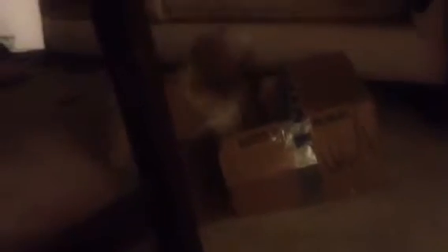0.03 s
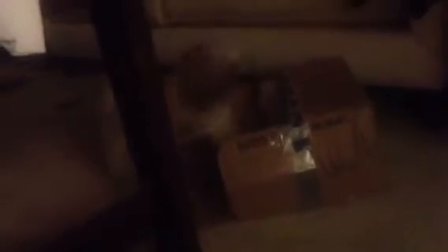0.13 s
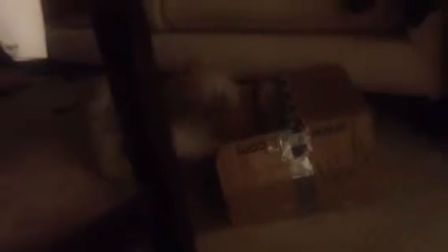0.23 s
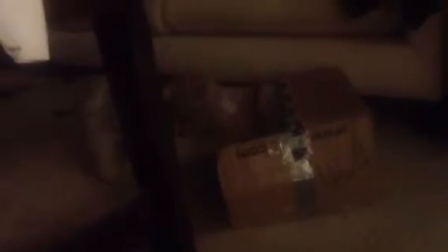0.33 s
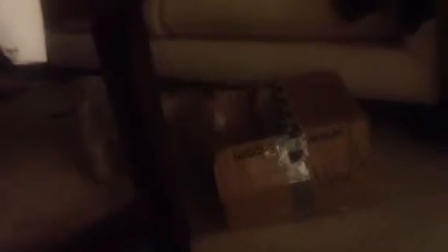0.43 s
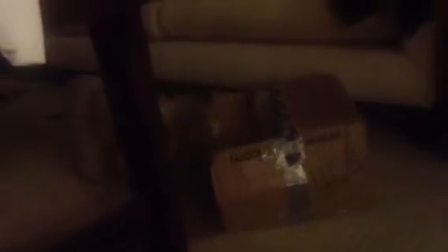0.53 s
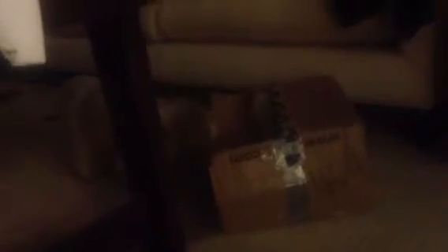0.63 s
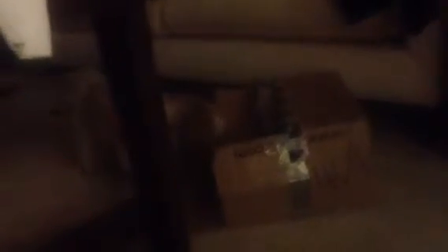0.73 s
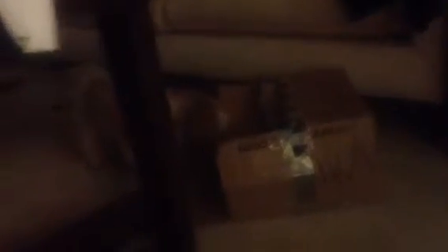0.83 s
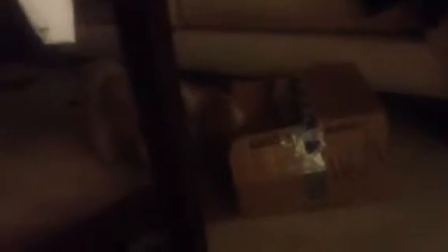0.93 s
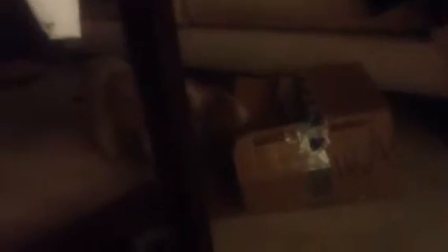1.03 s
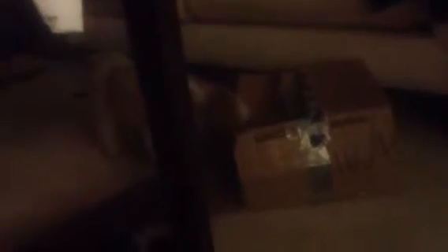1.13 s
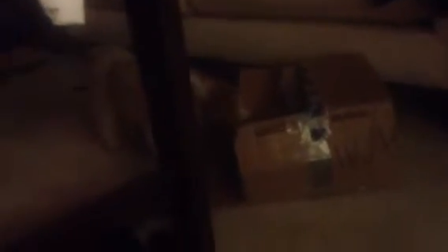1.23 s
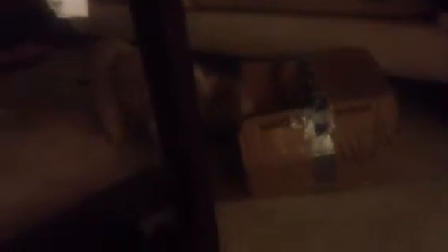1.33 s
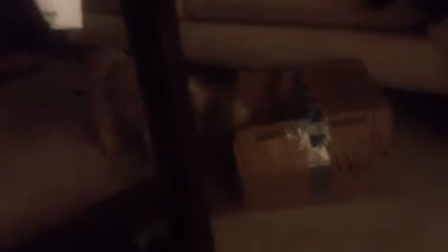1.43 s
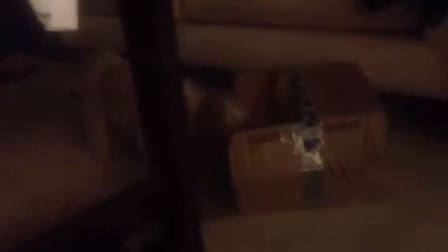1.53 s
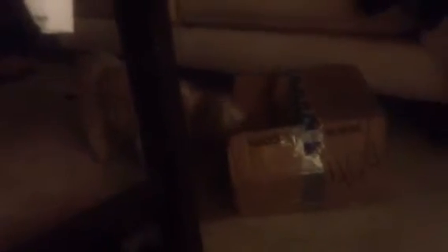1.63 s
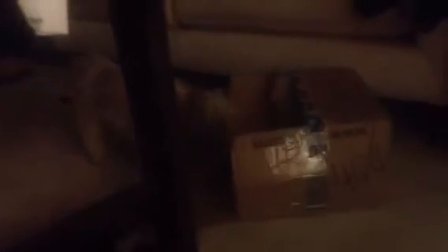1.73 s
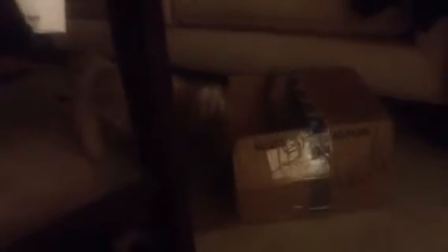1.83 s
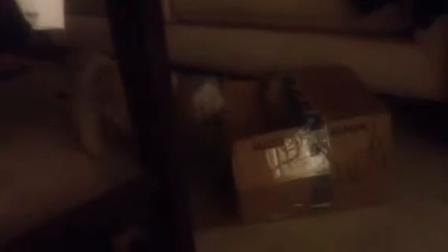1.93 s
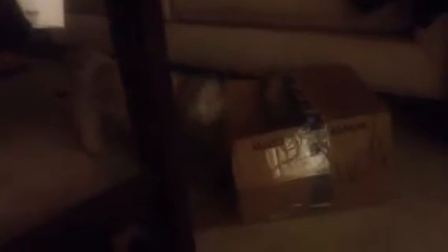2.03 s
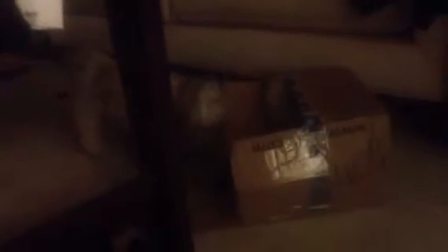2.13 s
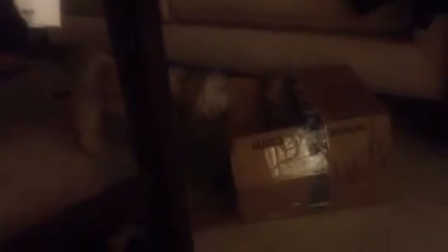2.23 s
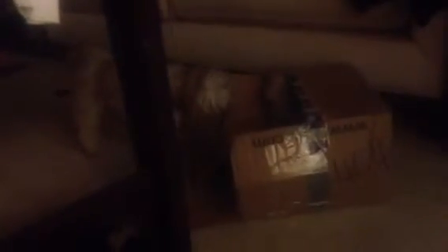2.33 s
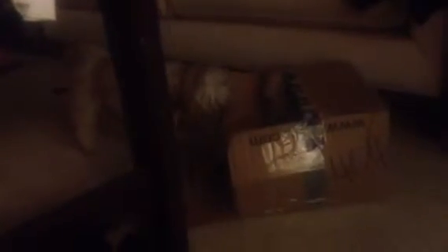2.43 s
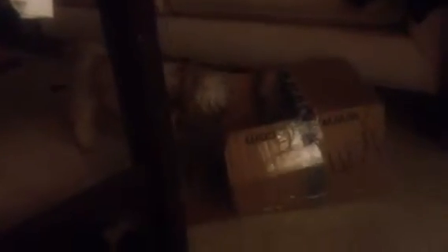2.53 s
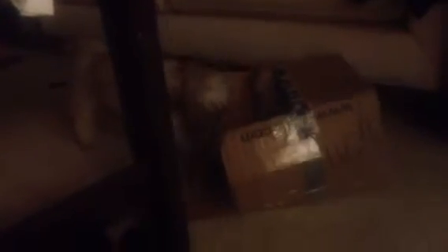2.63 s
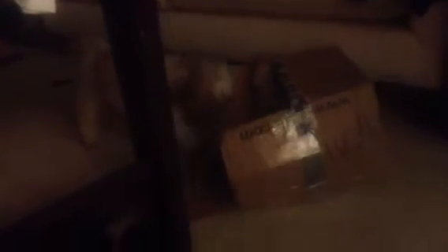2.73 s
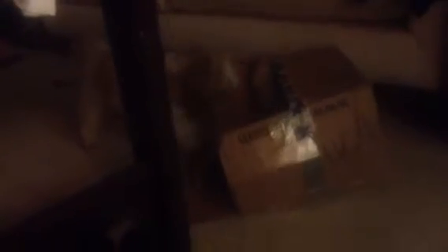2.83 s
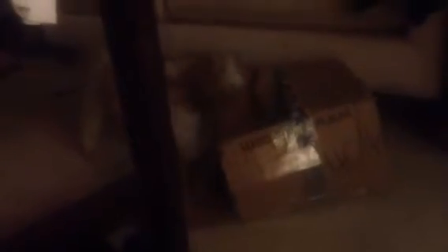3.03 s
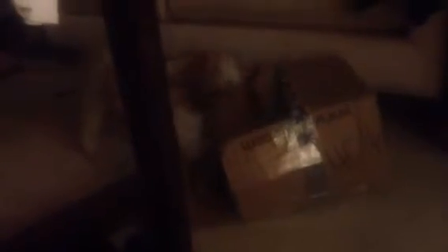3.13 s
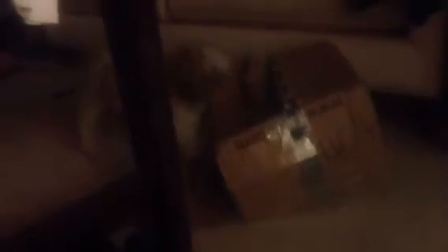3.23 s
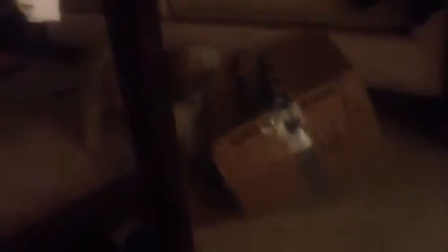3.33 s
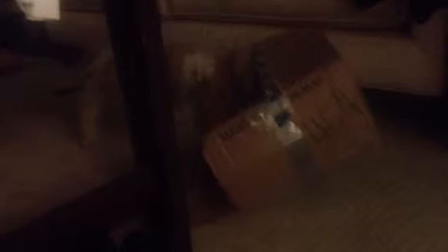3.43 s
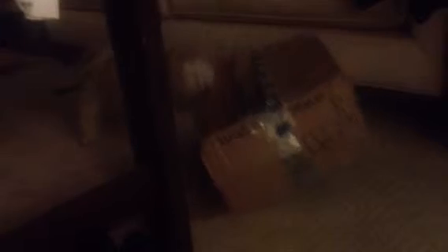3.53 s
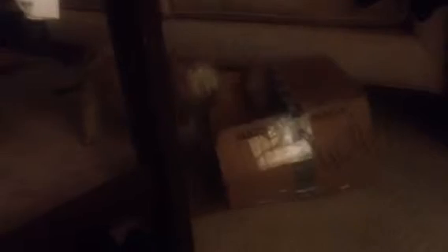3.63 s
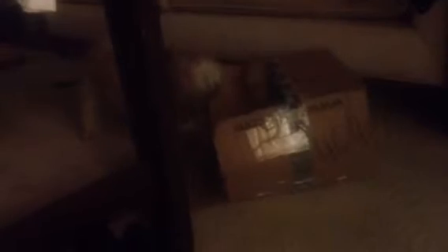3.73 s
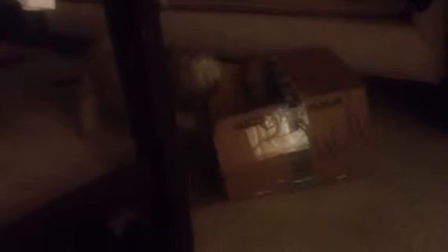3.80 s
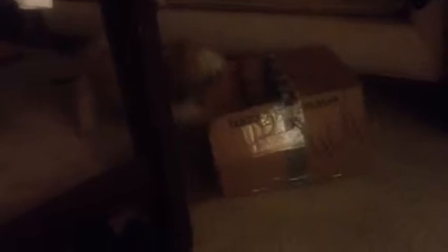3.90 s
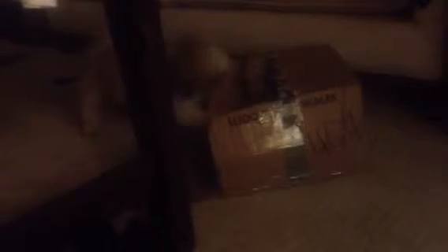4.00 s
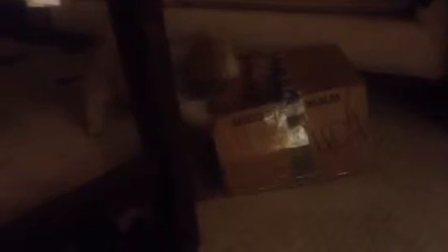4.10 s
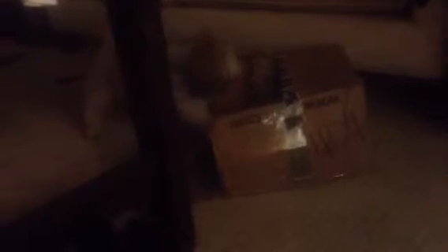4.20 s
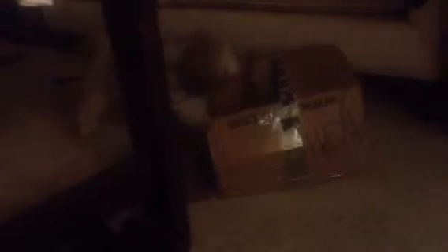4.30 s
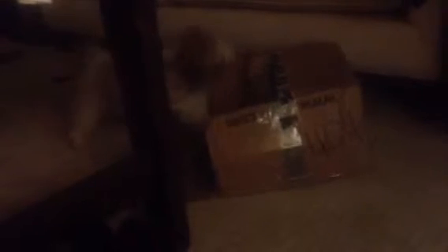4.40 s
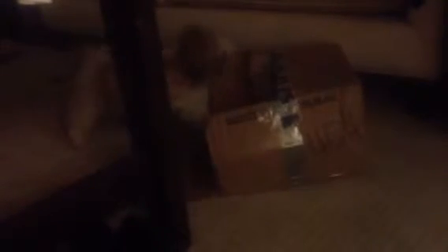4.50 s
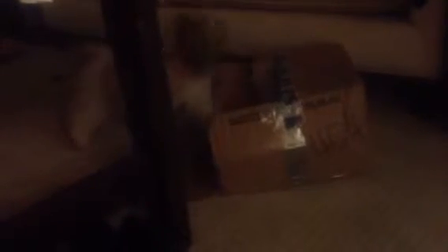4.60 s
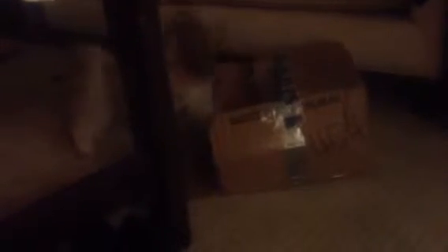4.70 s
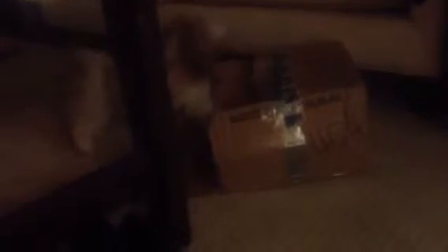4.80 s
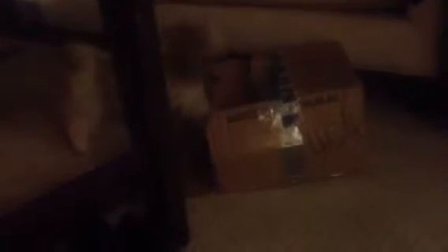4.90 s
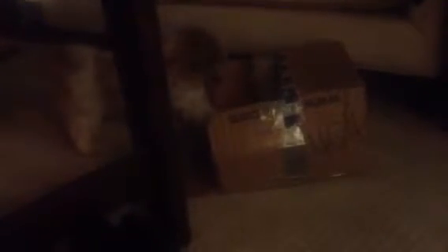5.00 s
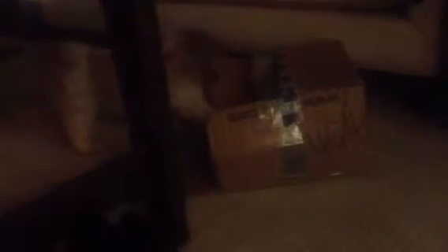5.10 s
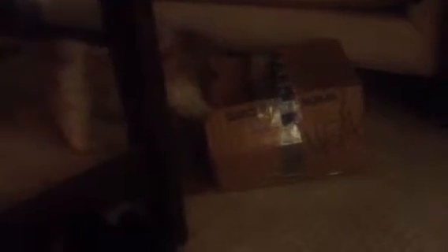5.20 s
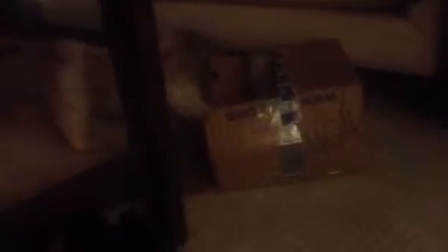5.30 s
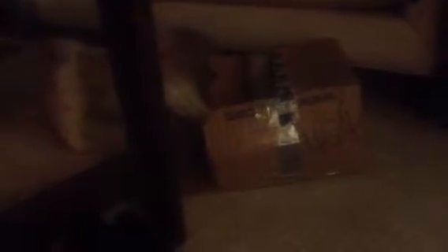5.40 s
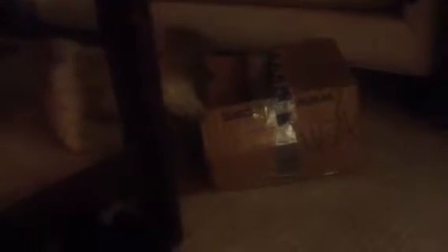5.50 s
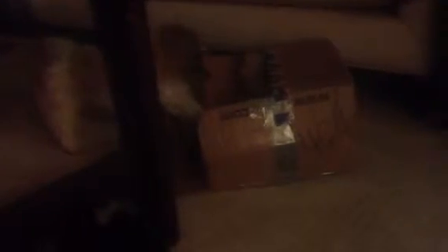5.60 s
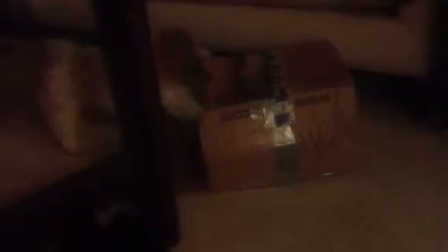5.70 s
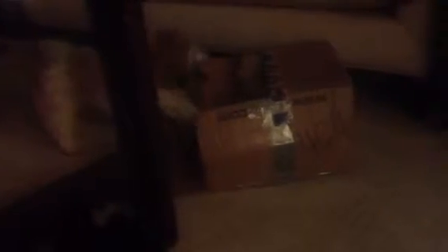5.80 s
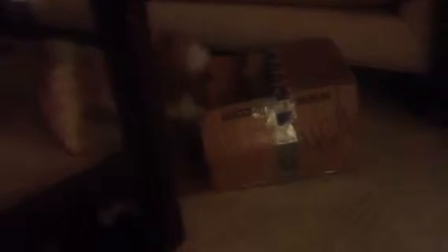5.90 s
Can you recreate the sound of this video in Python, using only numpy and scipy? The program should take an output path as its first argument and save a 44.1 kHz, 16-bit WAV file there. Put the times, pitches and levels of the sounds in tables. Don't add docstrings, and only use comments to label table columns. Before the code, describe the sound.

A dog paws and noses a cardboard box on carpet, with hollow thuds, sharp claw cracks, board scrapes and papery rustles in a quiet room.

```python
import sys
import numpy as np
from scipy import signal
from scipy.fft import rfft, irfft, next_fast_len
from scipy.io import wavfile
from scipy.ndimage import uniform_filter1d, map_coordinates

SR = 44100
rng = np.random.default_rng(int(sys.argv[2]) if len(sys.argv) > 2 else 0)


def makeup_ratio(level_db):
    decades = np.asarray(level_db, float) / 20
    return 10 ** decades


def waveform_to_disk(signal):
    frames = np.transpose(np.atleast_2d(signal))
    scaled = np.clip(frames, -1, 1) * 32767
    samples = np.round(scaled).astype(np.int16)
    wavfile.write(sys.argv[1], SR, samples)


N = 262395


def unit(x):
    return x / np.sqrt(np.mean(x ** 2) + 1e-20)


def along(points):
    f, db = np.transpose(points)
    return lambda hz: makeup_ratio(np.interp(np.log(hz + 1), np.log(f), db, left=-120, right=-120))


def modes(rows):
    def response(f):
        total = 0
        for k, (hz, width, db) in enumerate(rows):
            total = total + (-1) ** k * makeup_ratio(db) * 1j * f * width / (hz * hz - f * f + 1j * f * width)
        return total
    return response


def causal(gain):
    def response(hz):
        c = irfft(np.log(np.abs(gain(hz)) + 1e-4))
        c[1:len(c) // 2] *= 2
        c[len(c) // 2 + 1:] = 0
        return np.exp(rfft(c))
    return response


def filtered(x, response):
    m = 2 * next_fast_len(len(x) // 2 + 2048)
    return irfft(rfft(x, m) * response(np.fft.rfftfreq(m, 1 / SR)), m)[:len(x)]


def wobble(rate):
    knots = rng.standard_normal(int(N * rate / SR) + 4)
    return map_coordinates(knots, [np.arange(N) * rate / SR])


def grit(per_second, spread_db, life, grain_db, flutter_db):
    size = makeup_ratio(spread_db * np.minimum(rng.exponential(size=N), 3))
    slips = (rng.random(N) < per_second / SR) * size
    bursts = signal.lfilter([1], [1, -np.exp(-1 / (life * SR))], slips)
    rough = np.sqrt(1 + (makeup_ratio(grain_db) * unit(bursts)) ** 2)
    return rough * makeup_ratio(flutter_db * wobble(40)) * rng.standard_normal(N)


def patchy(x, depth_db):
    z = signal.stft(x, nperseg=128)[2]
    field = uniform_filter1d(rng.standard_normal(z.shape), size=4, axis=0)
    field = uniform_filter1d(field, size=3, axis=1)
    return signal.istft(z * makeup_ratio(depth_db * unit(field)), nperseg=128)[1][:N]


def add(track, s, db, x):
    part = track[max(round(s * SR), 0):][:len(x)]
    part += (makeup_ratio(db) * x / np.abs(x).max())[:len(part)]


def blow(t60, burst_db, rattle_db, room_db, room_t60):
    t = np.arange(SR // 3) / SR
    contact_burst = makeup_ratio(burst_db - 60 * t / .005)
    rattle = makeup_ratio(rattle_db - 60 * t / abs(t60))
    tail = makeup_ratio(rattle_db + room_db - 60 * t / room_t60)
    return (t == 0) + (contact_burst + rattle + tail) * rng.standard_normal(len(t))


# f/Hz, level per Hz/dB
HUM_HISS = [(18, -36), (75, -24.5), (125, -4), (170, -9.5), (228, 6.5), (290, -13), (345, -18.5), (420, -5),
            (480, -12.5), (1300, -13), (2700, -20.5), (5200, -21.5), (9900, -27), (15500, -23.5)]
HUM_HISS_DB = -66.5


def quiet():
    hiss = unit(filtered(rng.standard_normal(N), along(HUM_HISS)))
    return makeup_ratio(HUM_HISS_DB + 0.57 * wobble(2.18)) * hiss


# t/s, length/s, level/dB
SNIFFS = [
    (5.546, 0.0666, -65.5),
    (5.608, 0.10136, -69.5),
    (5.81, 0.069, -62.5),
    (5.886, 0.064, -66),
]
# f/Hz, width/Hz, level/dB
NOSE = [(1430, 365, 2), (1820, 393.7, -1.5), (2700, 208, 1.5), (4720, 360, -17)]


def sniffs():
    air = unit(filtered(rng.standard_normal(N), modes(NOSE)))
    t, puffs = np.arange(N) / SR, 0
    for s, length, db in SNIFFS:
        u = np.clip((t - s) / length, 0, 9)
        puffs = puffs + makeup_ratio(db) * np.minimum(u * 6, 1) * np.exp(-u ** 3.5)
    return puffs * air


def effort(s, db, rise, hold, fade):
    t = np.arange(0, N, 16) / SR - s
    return makeup_ratio(db + 20 * np.minimum(t, 0) / abs(rise) - 20 * np.maximum(t - abs(hold), 0) / abs(fade))


# t/s, board level/dB, hold/s, fade time for 20 dB/s, paper over board/dB
CATCHES = [(0.205, -52, 0.076, 0.0564, 1.5), (0.267, -42, 0.036, 0.1175, -1),
           (1.072, -68, .002, 0.14, -4.5), (1.543, -63, .002, 0.05, -6), (1.734, -64.5, .02, 0.27, 1),
           (1.768, -59, 0.013, 0.1975, -3.5), (2.204, -66.5, .005, 0.32, -0.5),
           (2.407, -53, .003, -0.23, -1), (2.51, -57, 0.028, 2, -0.5), (2.783, -49, .003, 0.1682, 1),
           (2.807, -39.5, 0.0024, 0.113, 3), (3.19, -53.5, 0.0097, 0.53, 1), (3.679, -48, 0.03, 0.1, 0),
           (3.969, -44, 0.0156, 0.2092, 1.5), (4.279, -52, 0.0024, 0.1984, -4.5),
           (4.467, -45.5, 0.0028, 0.1183, 0.5), (4.576, -39, 0.0033, 0.1076, 3),
           (5.208, -71, 0.027, 0.12, 2.5), (5.559, -77, .05, 0.35, -2), (5.827, -74, .03, 4, -12.5)]
CATCH_S = 0.0061
# peak t/s, board level/dB, swell and fade times for 20 dB/s, paper over board/dB
BRUSHES = [(0.046, -54, 1.07, 0.1023, 1.5), (0.358, -44, 0.1166, 0.0734, 2.5), (1.62, -68, 0.4, 0.4, 1),
           (1.88, -64.5, 0.3969, 0.45, 1), (2.33, -72, .4, .5, 0), (2.597, -50, .08, .36, 0),
           (3.06, -48, .22, .052, -1), (3.165, -59, .04, .2, 7), (3.31, -55, .1, .14, 8),
           (3.39, -59, .05, .08, 4), (3.545, -50, .2, .13, -6), (3.62, -63, .1, .11, 6),
           (3.95, -66, .09, .02, 4), (4.08, -54, .1, .08, 1), (4.265, -51.5, .17, .07, 4),
           (4.46, -50.5, .2, .05, 3), (4.765, -62, 1.02, 0.1961, -1.5), (5.1, -76.5, 1, 0.1917, 7),
           (5.49, -69, 0.1, 0.1, -4), (5.93, -63, 0.1255, 0.34, 1)]
# peak t/s, paper level/dB, swell and fade times for 20 dB/s
STIRS = [(1.09, -71, 0.45, 0.54), (1.19, -62, 0.06, 0.17), (1.35, -68, 0.25, 0.33), (1.8, -56, 0.1229, 0.5),
         (1.95, -60, 0.17, 0.24), (2.08, -60, .5, .07), (2.775, -56, .5, .02), (3.0, -55, .15, .1),
         (3.228, -42.5, .07, .18), (3.516, -39.5, .14, .085), (5.74, -73, 1, 0.2)]
STIR_BOARD_DB = -9


def contact():
    catches = [(effort(s, db, CATCH_S, hold, fade), paper_db) for s, db, hold, fade, paper_db in CATCHES]
    brushes = [(effort(s, db, rise, 0, fade), paper_db) for s, db, rise, fade, paper_db in BRUSHES]
    for s, db, rise, fade in STIRS:
        brushes.append((effort(s, db + STIR_BOARD_DB, rise, 0, fade), -STIR_BOARD_DB))
    paper = np.sqrt(sum((g * makeup_ratio(paper_db)) ** 2 for g, paper_db in catches + brushes))
    board = [np.sqrt(sum(g ** 2 for g, _ in kind)) for kind in (catches, brushes)]
    return np.repeat(board + [paper], 16, axis=1)[:, :N]


# f/Hz, level per Hz/dB
PAPER = [(4600, -87.5), (5500, -3.5), (6500, -1), (8500, 0.5), (11000, -1.5), (13000, -3), (15500, -14)]


def rustle(paper):
    leaf = grit(per_second=300, spread_db=5.5, life=0.00103, grain_db=-7.0, flutter_db=1.84)
    return paper * makeup_ratio(-2.03) * unit(filtered(patchy(leaf, depth_db=1.8), along(PAPER)))


# f/Hz, width/Hz, level/dB
CAVITY = [(123.4, 14.2, -4.5), (205, 38.5, 4.5), (231.78, 27.04, 7), (273.86, 14.4, 2), (365.5, 49.4, -6)]
# f/Hz, width/Hz, level/dB
PANELS = [(423.4, 25.98, -5.5), (475, 39, -6), (560, 55.7, -7.5), (663.1, 35.3, 0.5), (776.8, 32.9, -4),
          (914.1, 24.05, 2), (1058, 57.8, -7), (1212, 126.7, -4), (1287, 179, -8.5), (1739.3, 23.79, -4.5)]
# f/Hz, level per Hz/dB
BOARD = [(1100, -7), (1500, -5), (1800, -4.5), (2200, -6.5), (3000, -3.5), (4000, -1.5), (5200, -2.5),
         (6000, -22.5)]
# t/s, level/dB
LEAN = [(0.0, -49.5), (0.16, -69.5), (0.28, -69), (0.45, -61), (0.75, -83), (1.4, -70.5), (2.3, -65.5),
        (2.72, -66), (2.94, -53.5), (3.3, -58.5), (3.45, -61), (3.8, -57), (3.93, -66.5), (4.05, -52),
        (4.37, -62), (4.76, -60), (5.0, -71), (5.95, -66.5)]
LEAN_PANEL_DB = -7.5
CATCH_DULL_DB, CATCH_CAVITY_DB, CATCH_PANEL_DB = -2.5, -17, -9
BRUSH_DULL_DB, BRUSH_CAVITY_DB, BRUSH_PANEL_DB = -3, -6, -4


def strokes(catch, brush):
    lean = makeup_ratio(np.interp(np.arange(N) / SR, *np.transpose(LEAN)))

    def both(catch_gain, brush_gain, rest=0):
        return np.sqrt((catch_gain * catch) ** 2 + (brush_gain * brush) ** 2 + rest ** 2)

    low = grit(per_second=53, spread_db=1.5, life=0.00345, grain_db=-7, flutter_db=3.5)
    face = grit(per_second=400, spread_db=5.5, life=0.0013, grain_db=-8, flutter_db=1.0)
    face = patchy(face, depth_db=2.3)
    dull = makeup_ratio(np.array([CATCH_DULL_DB, BRUSH_DULL_DB]))
    bright = np.sqrt(1 - dull ** 2)

    below = lambda f: 1 / (1 + (f / 2900) ** 8)
    air = lambda f: modes(CAVITY)(f) * f ** 2 / (f ** 2 + 130 ** 2)
    dull_face = lambda f: along(BOARD)(f) * below(f)
    bright_face = lambda f: along(BOARD)(f) * (1 - below(f))

    air_gain = both(makeup_ratio(CATCH_CAVITY_DB), makeup_ratio(BRUSH_CAVITY_DB), lean)
    panel_gain = both(makeup_ratio(CATCH_PANEL_DB), makeup_ratio(BRUSH_PANEL_DB), lean * makeup_ratio(LEAN_PANEL_DB))
    out = air_gain * unit(filtered(low, air))
    out += panel_gain * unit(filtered(low + face, modes(PANELS)))
    out += makeup_ratio(-2.0) * both(*dull) * unit(filtered(face, dull_face))
    out += makeup_ratio(-4.0) * both(*bright) * unit(filtered(face, bright_face))
    return out


# t/s, level/dB, hold/s, fade time for 20 dB/s, f/Hz
CHATTERS = [(0.024, -55, .037, .025, 10600), (0.01, -59.5, 0.052, 0.02, 1310),
            (0.215, -57.5, 0.031, 0.16, 1097), (0.288, -46, 0.014, 0.0378, 6880),
            (0.29, -45.5, 0.0174, 0.0966, 4270), (0.332, -49, .034, .02, 1780),
            (0.33, -50.5, 0.029, 0.0249, 8770), (1.768, -62.5, 0.0193, 0.09, 1500),
            (1.77, -64.5, 0.019, .2, 4300), (2.4135, -45, .007, .05, 4400), (2.414, -54, 0.0098, .05, 1397),
            (2.505, -46.5, 0.0217, -0.063, 1750), (2.506, -51, 0.0153, -0.07, 2700),
            (2.588, -57, .02, -0.0551, 4400), (2.81, -42, .002, .05, 4500),
            (3.505, -48.5, 0.0185, 0.0546, 10650), (3.97, -47.5, 0.0163, 0.08, 1742),
            (4.266, -58, 0.0058, 0.07, 4380), (4.282, -50, 0.0276, 0.0633, 2277),
            (4.282, -51, 0.014, 0.0762, 3110), (4.285, -55, 0.0293, 0.06, 1348),
            (4.472, -53, 0.0212, .06, 2206), (4.577, -43, .01, .05, 1393),
            (4.58, -43.5, 0.0173, 0.0519, 2950), (4.58, -46, 0.0109, 0.06, 4620),
            (5.89, -73, .04, .04, 4700), (5.897, -69, .045, .04, 8200), (1.18, -71, .02, .05, 1450),
            (3.04, -55, .02, .04, 4700), (2.975, -62, .04, .05, 4700), (2.981, -52, .002, .008, 9500),
            (0.28, -40, .002, .008, 3000), (4.006, -48, .002, .008, 8500), (3.929, -60, .003, .01, 7000),
            (3.68, -53, .02, .04, 3200), (4.0, -56, .03, .06, 4600), (4.075, -58, .015, .04, 4600),
            (2.93, -59, .03, .06, 1400), (3.215, -50, .03, .04, 9200), (0.27, -47, .015, .02, 2600),
            (4.598, -41, .018, .03, 500), (4.426, -50, .035, .03, 850), (2.782, -44, .012, .04, 660),
            (3.475, -52, .015, .03, 950)]
# t/s, level/dB, fade time for 20 dB/s, f/Hz
CRACKLES = [(2.599, -47, .004, 5000), (2.628, -51, .004, 4400), (3.006, -52, .004, 12500),
            (3.155, -50, .005, 10500), (3.165, -50, .006, 10500), (3.188, -51, .005, 11000),
            (3.389, -52, .004, 11000), (4.239, -41, .006, 8500), (4.61, -47, .13, 1150),
            (2.52, -49, .05, 1800), (4.66, -59, .15, 1900), (5.905, -70, .1, 4700)]
CRACKLE_HOLD_S = .001
CHATTER_WIDTH, CHATTER_SLIPS, CHATTER_SPREAD_DB = 0.194, 900, 3.5


def chatters():
    out, t = np.zeros(N), np.arange(SR // 6) / SR
    crackles = [(s, db, CRACKLE_HOLD_S, fade, hz) for s, db, fade, hz in CRACKLES]
    for s, db, hold, fade, hz in list(CHATTERS) + crackles:
        when = rng.random(len(t))
        size, hiss = rng.standard_normal((2, len(t)))
        slips = (when < CHATTER_SLIPS / SR) * np.sign(hiss) * makeup_ratio(CHATTER_SPREAD_DB * size)
        rub = unit(slips) + 0.596 * hiss
        ring = unit(filtered(rub, lambda f: modes([(hz, CHATTER_WIDTH * hz, 0)])(f) ** 2))
        x = ring * np.minimum(t / .002, 1) * makeup_ratio(db - 20 * np.maximum(t - abs(hold), 0) / abs(fade))
        part = out[round(s * SR):][:len(t)]
        part += x[:len(part)]
    return out


# t/s, peak level/dB, f/Hz, fade time for 60 dB/s
RINGS = [(2.212, -40, 222, .13), (2.413, -30, 270, .06), (2.413, -33, 205, .16), (2.43, -43, 900, .07),
         (2.448, -38, 290, .08), (2.503, -34, 830, .06), (2.512, -39, 650, .13), (2.514, -34.5, 895, .11),
         (2.52, -50, 400, .12), (2.535, -53, 235, .5), (2.54, -46, 790, .2), (2.781, -33, 275, .06),
         (2.781, -40, 400, .06), (2.782, -41, 560, .08), (2.785, -38, 700, .08), (2.787, -43, 790, .06),
         (2.805, -37, 790, .08), (2.806, -31, 570, .045), (2.809, -24.5, 207, .12), (2.807, -33, 330, .05),
         (2.814, -37, 904, .1), (2.818, -32, 651, .14), (2.84, -40, 400, .07), (2.84, -43, 270, .1),
         (2.845, -37, 570, .1), (2.85, -38, 700, .05), (3.68, -48, 560, .2), (3.682, -35, 200, .3),
         (3.685, -45, 780, .1), (3.688, -31, 265, .1), (3.716, -39, 280, .1), (3.733, -48, 920, .06),
         (3.76, -43, 230, .2), (4.437, -43, 260, .06), (4.44, -43, 690, .08), (4.471, -28, 221, .13),
         (4.484, -41, 930, .06), (4.577, -36, 870, .08), (4.59, -37, 570, .17), (4.594, -33.5, 930, .13),
         (4.595, -25, 199, .14), (4.6, -33, 420, .14), (4.605, -26.5, 275, .1), (4.603, -36, 470, .13),
         (4.61, -37, 680, .17), (4.632, -41, 400, .08), (4.655, -49, 910, .4), (4.69, -47, 420, .12),
         (4.695, -52, 560, .15)]
RING_RISE_S = .003
RING_WANDER, RING_FLUTTER_DB, RING_FLUTTER_S = .07, 2.5, .007


def rings():
    out, t = np.zeros(N), np.arange(SR // 3) / SR
    for s, db, hz, t60 in RINGS:
        drift, waver = rng.standard_normal((2, len(t)))
        wander = np.cumsum(drift) * np.sqrt(2 * np.pi * RING_WANDER * hz / SR)
        flutter = RING_FLUTTER_DB * unit(uniform_filter1d(waver, size=round(RING_FLUTTER_S * SR)))
        swell = 1 - np.exp(-t / RING_RISE_S)
        add(out, s, db, np.sin(2 * np.pi * hz * t + wander) * makeup_ratio(flutter - 60 * t / abs(t60)) * swell)
    return out


# t/s, peak level/dB, treble over the tick/dB, loose rattle/dB
CLAWS = [(0.2049, -37.5, -7.5, -8), (0.2678, -22, -10, -12.5), (0.2772, -31, -16.5, -10),
         (0.291, -36, -0.5, -15), (1.7657, -35.5, -14, -18), (1.9464, -51, 4, -9.5), (2.3431, -43, -5, -20),
         (2.3785, -57, 9, -13.5), (2.4105, -40, -7.5, -9.5), (2.4141, -22.5, -14.5, -13.5),
         (2.8102, -10, -19.5, -20), (3.041, -35, 0.5, -2), (3.2154, -38, 7.5, -1.5),
         (3.3894, -42.5, -13.5, -23), (3.6968, -33, 5.5, -6.5), (3.9741, -26, -7.5, -22),
         (4.2034, -36.5, -17, -14), (3.9587, -37, -9, -14), (4.24, -47.5, 10, -9), (4.4697, -31.5, 5, -7.5),
         (4.8638, -50, -10.5, -13), (5.202, -53, 1, -14.5), (5.222, -53, 1.5, -13)]
CLAW_HZ = 4704
# t/s, peak level/dB, treble over the snap/dB, f/Hz, loose rattle/dB
FLAPS = [(0.2502, -16, -17, 2870, -12.5), (1.5424, -57, -7, 2800, -7.5), (1.6964, -51.5, -8, 1810, -15.5),
         (1.729, -40, -20, 2300, -22.5), (2.2125, -54.5, 9, 1510, 2), (2.4159, -38, 9, 1460, -14),
         (2.5045, -23, -3.5, 1800, -6), (2.782, -31.5, -3, 2260, -11.5), (2.809, -31, 11.5, 1549, -7),
         (2.93, -38, -1, 1540, -11), (3.1364, -43, 1, 1670, 0), (3.1963, -24.5, -9, 2410, -11),
         (3.2572, -38.5, -4, 1800, -8.5), (3.287, -44, 12, 1530, -14.5), (3.3014, -36.5, 7.5, 1500, -16),
         (3.3095, -39, 9.5, 1820, -19.5), (3.4998, -33, 1, 2900, -2.5), (3.5181, -31, -3.5, 1860, 8.5),
         (3.677, -32, -15.5, 3080, -5.5), (3.9662, -23, -6.5, 3640, -9), (3.975, -41, -6.5, 1500, 6),
         (4.2812, -29.5, -8, 2180, -9.5), (4.5794, -16.5, -7.5, 2990, -10)]


def snaps():
    out = np.zeros(N)
    claws = [(s, db, treble_db, CLAW_HZ, rattle_db) for s, db, treble_db, rattle_db in CLAWS]
    for s, db, treble_db, hz, rattle_db in claws + list(FLAPS):
        crack = blow(0.1413, burst_db=4, rattle_db=rattle_db, room_db=-16, room_t60=0.61)
        pitch = lambda f: (0.26 + modes([(hz, .4 * hz, 0)])(f)) / (1 + (f / hz / 4.0) ** 4)
        add(out, s, db - 5.5, filtered(crack, causal(lambda f: along(BOARD)(f) * pitch(f))))
        thin = lambda f: along(PAPER)(f) * makeup_ratio(0.27 * treble_db * np.log2((f + 1) / 8500))
        add(out, s, db + treble_db, filtered(crack, causal(thin)))
    return out


# t/s, peak level/dB, f/Hz, fade time for 60 dB/s
THUDS = [(0.21, -49, 263, .3), (0.26, -42.5, 316, 0.33), (1.07, -54.5, 262, 0.226), (1.696, -54, 260, .1),
         (1.724, -49, 262, 0.075), (2.21, -41, 225.3, 0.12), (2.412, -33, 300, 0.067),
         (2.781, -39, 240, 0.1), (2.807, -32, 300, 0.104), (2.903, -40, 203.9, 0.4494),
         (3.678, -45, 178, .2), (3.684, -34, 256.5, 0.25), (3.959, -40, 355, 0.32),
         (3.966, -34, 257.4, 0.21), (4.215, -40, 205, 0.068), (4.276, -41, 243.6, 0.22),
         (4.471, -35, 218, 0.12), (4.575, -31, 250, 0.15), (4.598, -33, 340, 0.12), (4.99, -49, 236, .2)]
# t/s, peak level/dB, f/Hz, fade time for 60 dB/s
RAPS = [(0.02, -45.5, 898, 0.36), (0.205, -46, 680, 0.55), (0.255, -38, 716, 0.22), (1.07, -56, 865, 0.185),
        (1.696, -56, 700, 0.13), (2.21, -41, 617, 0.152), (2.412, -39, 404, 0.2), (2.414, -40, 837, 0.146),
        (2.5025, -35, 1100, 0.147), (2.516, -38, 895, 0.113), (2.78, -39, 632, 0.2),
        (2.807, -33, 450, 0.12), (2.826, -38, 780, 0.1), (3.678, -43.5, 733.2, .2), (3.686, -41, 690, 0.15),
        (3.959, -34, 472, 0.28), (3.964, -28, 820, .17), (3.97, -34, 1140, 0.1457),
        (4.19, -49.5, 881, 0.108), (4.284, -37.5, 895, 0.452), (4.474, -43.5, 909.4, 0.324),
        (4.576, -33, 480, 0.25), (4.603, -33, 560, 0.15)]
# t/s, air peak level/dB, air f/Hz, panel over air/dB
NUDGES = [(0.267, -50.5, 334, -16.5), (1.179, -64, 234, 7.5), (1.545, -57, 260, 0.5),
          (1.764, -51.5, 342, 1.5), (1.998, -47.5, 230, -26.5), (3.041, -44, 231, -2),
          (3.194, -40.5, 222.4, -2.5), (3.239, -41.5, 220.8, -4), (4.432, -43, 236.3, -10),
          (5.104, -52, 230, -12.5), (5.267, -54, 230.5, -16)]
NUDGE_PANEL_HZ, NUDGE_T60_S = 691, 0.209
# t/s, peak level/dB
BUMPS = [(0.245, -58.5), (2.204, -79.5), (2.805, -50), (3.525, -52), (3.682, -44), (3.72, -55), (4.45, -48),
         (4.471, -43), (4.578, -62.5), (4.603, -40.5), (4.649, -60.5)]
# f/Hz, width/Hz, level/dB
FLOORBOARD = [(105.25, 14, 3), (128.1, 22.8, 12)]


def knocks():
    out = np.zeros(N)

    def near(rows, hz, reach):
        return [(c, w, db - reach * abs(np.log2(c / hz))) for c, w, db in rows]

    small = lambda f: (1j * f / 150 / (1 + 1j * f / 150)) ** 2
    air_push = lambda f: small(f) / (1 + 1j * f / 600)
    panel_push = lambda f: small(f / 2.5) / (1 + 1j * f / 1500)
    floor = lambda f: modes(FLOORBOARD)(f) / (1 + 1j * f / 160) ** 2

    nudge_thuds = [(s, db, hz, NUDGE_T60_S) for s, db, hz, _ in NUDGES]
    for s, db, hz, t60 in list(THUDS) + nudge_thuds:
        push = blow(t60, burst_db=-28.0, rattle_db=-32, room_db=-10, room_t60=0.435)
        body = near(CAVITY, hz, reach=15.56) + [(hz * 0.935, 100, -9)]
        add(out, s + 0.00132, db, filtered(filtered(push, air_push), modes(body)))

    nudge_raps = [(s, db + over_db, NUDGE_PANEL_HZ, NUDGE_T60_S) for s, db, _, over_db in NUDGES]
    for s, db, hz, t60 in list(RAPS) + nudge_raps:
        rap = blow(t60, burst_db=-19.0, rattle_db=-26.5, room_db=-15.5, room_t60=0.474)
        body = near(PANELS, hz, reach=22.65) + [(hz, 500, -17)]
        add(out, s + 0.001493, db, filtered(filtered(rap, panel_push), modes(body)))

    for s, db in BUMPS:
        push = blow(.12, burst_db=2.5, rattle_db=-17, room_db=-4, room_t60=0.32)
        add(out, s, db + 9, filtered(push, floor))
    return out


# t/s, level/dB
WALLS = [(.0013, -28), (.0031, -23.5), (.0058, -22.5), (.0087, -21.5), (.0126, -13), (.0171, -12.5)]
# peak f/Hz, width/Hz, dip f/Hz, width/Hz
PORT = (4720, 420, 5180, 320)


def scene():
    peak_hz, peak_width, dip_hz, dip_width = PORT
    port = lambda f: 1 + modes([(peak_hz, peak_width, -3)])(f) - modes([(dip_hz, dip_width, -1.8)])(f)
    bass_cut = lambda f: (1j * f / 95 / (1 + 1j * f / 95)) ** 4 * 1.128

    def walls(f):
        echoes = sum((-1) ** k * makeup_ratio(db) * np.exp(-2j * np.pi * f * s) for k, (s, db) in enumerate(WALLS))
        return makeup_ratio(-1.9271) * (1 + echoes)

    hum = quiet()
    catch, brush, paper = contact()
    box = sniffs() + rustle(paper) + strokes(catch, brush) + chatters() + rings() + snaps() + knocks()
    heard = filtered(box, lambda f: port(f) * walls(f) * bass_cut(f)) + hum
    return np.array([heard, heard])


def low_pass(x):
    return signal.sosfilt(signal.butter(12, 15350, fs=SR, output="sos"), x)


def record(dry):
    return low_pass(dry)


dry = scene()
out = record(dry)
waveform_to_disk(out)
```